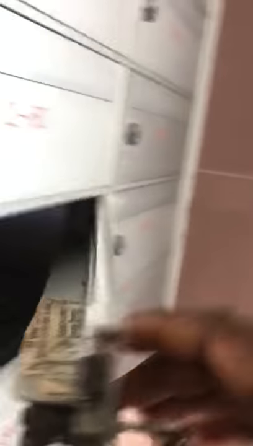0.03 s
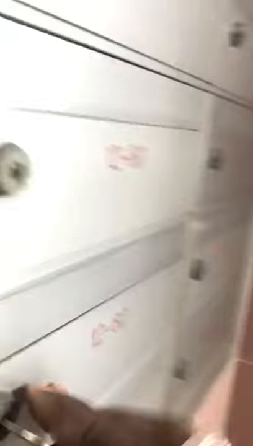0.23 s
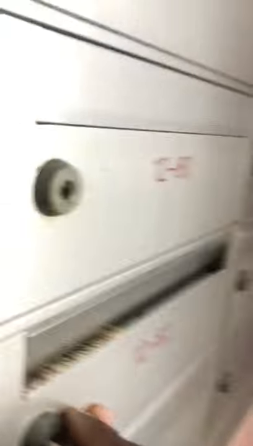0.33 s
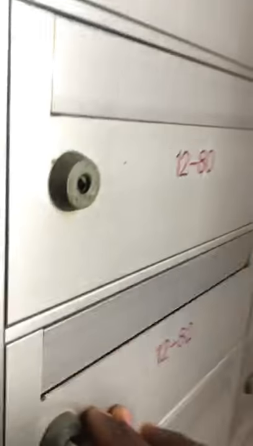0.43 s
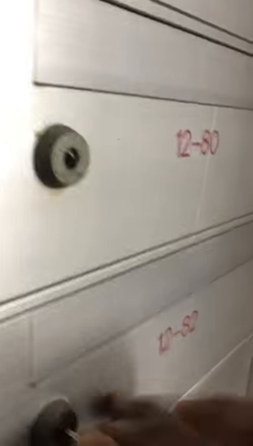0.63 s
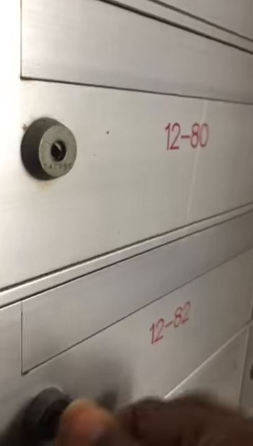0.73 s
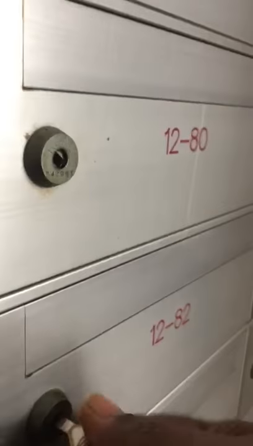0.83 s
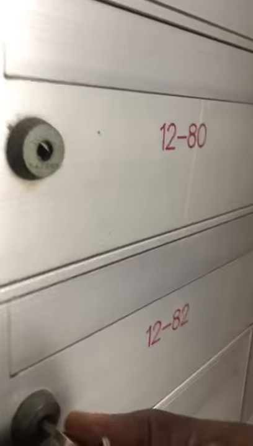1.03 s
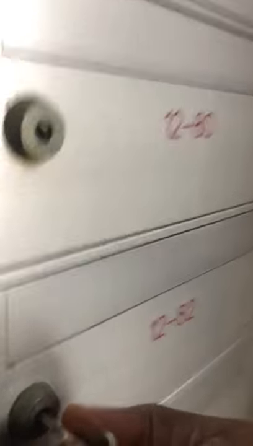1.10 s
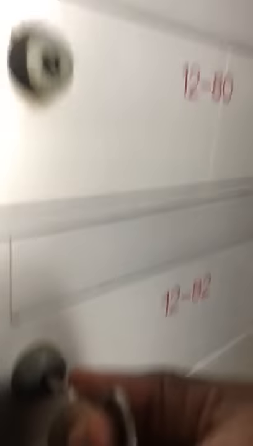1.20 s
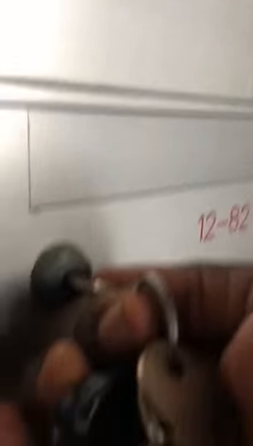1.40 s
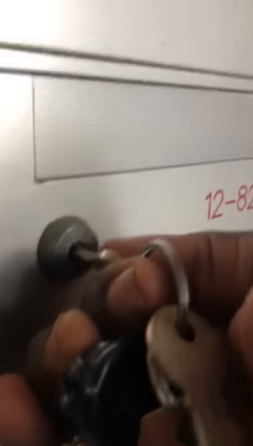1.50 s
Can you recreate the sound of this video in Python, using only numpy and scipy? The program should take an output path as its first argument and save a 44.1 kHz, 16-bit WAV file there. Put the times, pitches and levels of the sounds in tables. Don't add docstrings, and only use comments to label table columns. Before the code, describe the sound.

Close up in a hard-walled lobby, a metal mailbox door taps, slams and clicks shut; keys rattle in short bright chinks, with one loud final jingle, over low distant traffic rumble.

```python
import sys
import numpy as np
from scipy import signal
from scipy.io import wavfile

SR = 44100
rng = np.random.default_rng(int(sys.argv[2]) if len(sys.argv) > 2 else 0)


def unload_wav(signal):
    wavfile.write(
        sys.argv[1],
        SR,
        np.round(np.clip(np.atleast_2d(signal).T, -1, 1) * 32767).astype(np.int16),
    )


def magnitude_from_level(level_db):
    exponent = np.asarray(level_db, float) / 20
    return 10 ** exponent


N = 68355


def rms_one(x):
    return x / np.sqrt(np.mean(x ** 2) + 1e-20)


def in_time(rows):
    return np.interp(np.arange(N) / SR, *np.transpose(rows))


def drift(rate_hz):
    r = np.exp(-80 * np.pi * rate_hz / SR)
    slow = signal.lfilter([1], [1, -2 * r, r * r], rng.standard_normal(N // 40 + 2002))
    slow = rms_one(slow[2000:])
    return np.interp(np.arange(N) / 40, np.arange(len(slow)), slow)


def ring(clicks, hz, t60_s):
    r, w = magnitude_from_level(-60 / (t60_s * SR)), 2 * np.pi * hz / SR
    return signal.lfilter([0, np.sin(w)], [1, -2 * r * np.cos(w), r * r], clicks + 1e-18)


def band(x, low_hz, high_hz):
    edges_hz = [low_hz, min(high_hz, .45 * SR)]
    return signal.sosfilt(signal.butter(2, edges_hz, "band", fs=SR, output="sos"), x)


def coloured(white, spectrum, patchy_db):
    edges_hz = 22 * 2 ** np.arange(0, 9.6, .5)
    hz, db = np.transpose(spectrum)
    out = 0
    for k, (low_hz, high_hz) in enumerate(zip(edges_hz, edges_hz[1:])):
        log_centre = np.log(min(low_hz * high_hz, 11400 ** 2)) / 2
        level_db = np.interp(log_centre, np.log(hz), db, left=-90)
        flicker = magnitude_from_level(level_db + patchy_db * drift(12.4))
        out = out + flicker * band(white[k % 2], low_hz, min(high_hz, 12100))
    return rms_one(out)


def strikes(events, sound):
    out, t = np.zeros(N + SR), np.arange(SR // 4) / SR
    for s, db, *how in events:
        i = int(s * SR)
        out[i:i + len(t)] += magnitude_from_level(db) * sound(t, rng.standard_normal(len(t)), *how)
    return out[:N]


# t/s, level/dB
SWELL = [(0.0, -48.5), (0.288, -44), (0.46, -38), (0.928, -45), (1.19, -41.5), (1.402, -37.5), (1.55, -39)]
# f/Hz, level/dB per Hz
TRAFFIC = [(13, -37), (22, 1), (313, -0.5), (1000, -14.5), (1620, -18.5), (2610, -27), (6790, -38),
           (10700, -46), (12500, -66), (16200, -86.5), (22000, -120)]
# f/Hz, level/dB
HUM = [(97, -51), (199, -46), (295, -55)]


def traffic():
    rumble = coloured(rng.standard_normal((2, N)), TRAFFIC, patchy_db=.8)
    hum = 0
    for hz, db in HUM:
        level = magnitude_from_level(db - 4.0 + 5.1 * drift(49))
        phase = 2 * np.pi * np.cumsum(hz + 3.07 * drift(10.5)) / SR
        hum = hum + level * np.sin(phase)
    return magnitude_from_level(in_time(SWELL) - 2.5) * rumble + hum


def lobby(x):
    t60_s, gap_s, wall_cut_hz = 0.18, .004, 10000
    t = np.arange(SR // 2) / SR
    onset = np.clip((t - gap_s) / 0.0011, 0, 1)
    tail = 0.027 * rng.standard_normal(len(t)) * magnitude_from_level(-60 * t / t60_s) * onset
    return signal.fftconvolve(x, band(tail, 390, wall_cut_hz))[:N]


# t/s, level/dB
BUSTLE = [(0, -49.5), (.15, -45), (.21, -54.5), (.311, -56.5), (.316, -27.5), (.375, -21), (.395, -25),
          (.445, -32), (.52, -34.5), (.73, -49.5), (.77, -42), (.88, -42.5), (.97, -52), (1.085, -58.5),
          (1.098, -40), (1.19, -55.5), (1.22, -54.5), (1.55, -69.5)]
# f/Hz, level/dB per Hz
RUB = [(470, -33), (800, -0.5), (3040, 1.5), (4490, -1.5), (5340, 3.5), (10000, -4), (11500, -15),
       (12500, -47), (16200, -68), (22000, -120)]
# f/Hz, level/dB, t60/s
KEYS = [(2170, -12, .1), (4110, -8, .12), (4610, -8, .2), (5160, -8, .15), (5860, -8, .15), (6630, -4, .12),
        (7620, -6, .15), (8060, -6, .15), (8630, -8, .15), (9240, -2, .22), (9600, -8, .12),
        (10240, 0, .22), (11190, -1, .2), (11960, -3, .15)]


def handling():
    grains_per_s, grain_db = 3100, -3.5
    rub_db, rattle_db, rattle_growth = -3, -9, .64
    sizes = magnitude_from_level(grain_db * np.minimum(rng.exponential(1, (2, N)), 4))
    sizes = sizes * rng.choice([-1, 1], (2, N))
    grains = sizes * (rng.random((2, N)) < grains_per_s * magnitude_from_level(4 * drift(25)) / SR)
    rub = coloured(.6 * rng.standard_normal((2, N)) + grains, RUB, patchy_db=.8)
    dealt = rng.integers(0, len(KEYS), N)
    rattle = 0
    for k, (hz, db, t60_s) in enumerate(KEYS):
        rattle = rattle + magnitude_from_level(db) * ring(grains[0] * (dealt == k), hz, 0.43 * t60_s)
    bustle_db = in_time(BUSTLE)
    rattle_level = magnitude_from_level(rattle_db + rattle_growth * (bustle_db + 18))
    return magnitude_from_level(bustle_db) * (magnitude_from_level(rub_db) * rub + rattle_level * rms_one(rattle))


# t/s, level/dB, f/Hz, t60/s
BOOMS = [
    (0.349, -23, 148.6, 0.13),
    (.370, -24.5, 102.6, .12),
    (0.418, -18, 144.4, 0.036),
    (0.509, -19, 151.4, 0.067),
    (0.585, -38, 67, 0.098),
    (1.288, -40, 296, 0.25),
    (1.359, -25.5, 320, 0.077),
    (1.396, -36, 299, 0.23),
]


def booms():
    t = np.arange(N) / SR
    out = 0
    for s, db, hz, t60_s in BOOMS:
        swell = np.clip((t - s) / 0.011, 0, 1)
        decay = magnitude_from_level(db - 60 * np.maximum(t - s, 0) / t60_s)
        out = out + decay * swell * np.sin(2 * np.pi * hz * (t - s))
    return out


def chink(t, white, hz, second_hz, ring_share):
    chink_db, tick_db, fizz_db, others_db = -13, -9, -17, -13
    chatter, chatter_t60_s, fizz_t60_s, tick_t60_s = .055, .05, .07, .012
    held, detune, free_s, stop_t60_s = .3, .003, .07, .018

    def off_db(a_hz, b_hz):
        return -6 * (np.log2(a_hz / b_hz) / .04) ** 2

    touch = (t == 0) + chatter * white * magnitude_from_level(-60 * t / chatter_t60_s)
    rings = 0
    for (m_hz, db, t60_s), grip in zip(KEYS, white[::-1]):
        level_db = max(off_db(m_hz, hz), off_db(m_hz, second_hz) - 3, db + others_db)
        rings = rings + magnitude_from_level(level_db) * ring(touch, m_hz * (1 + detune * grip), t60_s * held)
    stop_s = np.clip(ring_share, .02, 1) * free_s
    stopped = magnitude_from_level(-np.minimum(60 * np.maximum(t - stop_s, 0) / stop_t60_s, 90))
    tick = white * magnitude_from_level(-60 * t / tick_t60_s) * np.minimum(t / .0006, 1)
    tick = band(tick, hz / 1.4, hz * 1.4)
    fizz = band(white * magnitude_from_level(fizz_db - 60 * t / fizz_t60_s), 5500, SR)
    return fizz + band(magnitude_from_level(chink_db) * rings * stopped + magnitude_from_level(tick_db) * tick, 2500, SR)


# t/s, peak level/dB, favoured f/Hz, second f/Hz, ring share/0-1
CHINKS = [(.388, -17, 11960, 10240, .5), (.405, -15, 11190, 10240, 0.3), (.412, -11.5, 10240, 7630, 0.9),
          (.520, -24.5, 11190, 6630, .1), (.546, -22.5, 6630, 11190, 0), (.5557, -21, 10240, 11190, 0.2),
          (.5776, -20, 10240, 9600, 0.15), (.5816, -16, 10240, 10240, 0.7), (.586, -28, 6630, 8630, 0.4),
          (.600, -20, 11960, 11960, .4), (.6044, -22, 10240, 9600, 0), (.6195, -18, 8640, 9600, 0),
          (.684, -28, 8640, 4100, 0), (.693, -24, 11960, 6640, 0.3), (.742, -26, 8640, 6640, 0.4),
          (.7586, -17, 9240, 6630, 0.27), (.785, -18, 11190, 6630, 0.3), (.808, -28, 11190, 10240, 0.4),
          (.821, -24, 11190, 10240, 0.4), (.831, -19, 11190, 10240, 0.06),
          (.838, -19.5, 10240, 11190, 0.25), (.840, -16.5, 9240, 10240, 1),
          (.883, -25.5, 10240, 9240, 0.03), (.930, -28.5, 7630, 10240, 0.03),
          (.950, -30, 8080, 10240, 0.06), (.9946, -36.5, 6640, 5160, 0.26), (1.0695, -24, 4110, 11190, 0),
          (1.0875, -34, 10240, 7630, 0), (1.0932, -16, 5160, 4110, 0.3), (1.0945, -17.5, 10240, 11190, 0.1),
          (1.103, -14.5, 7630, 7630, 0.5), (1.114, -17.5, 9240, 6630, 0), (1.1256, -6, 10240, 10240, 0.13),
          (1.1260, -21, 6160, 7630, 0.05), (1.155, -26, 10240, 6640, 0.17), (1.169, -23, 6640, 7630, 0),
          (1.1806, -19, 11190, 8060, 0), (1.3533, -29, 10240, 7630, 0)]


def key_bunch():
    return strikes(CHINKS, chink)


# f/Hz, level/dB, t60/s
DOOR = [(595, -3.5, 0.023), (955, -4.5, 0.019), (1566, -23, 0.03), (1627, 3.5, 0.03), (2186, 9, 0.042),
        (2454, 1.5, 0.013), (2900, 7.5, 0.0033), (3700, -13, 0.012), (3790, 10.5, 0.008), (4320, 7, 0.015),
        (5500, 11, 0.012), (6500, 13.5, 0.008), (8260, 13.5, 0.02), (8720, 16.5, 0.01)]


def knock(t, white, hz, shake_t60_s, body_db):
    knock_db, crack_db, far_modes_db = -25.5, -0.5, -21
    blow_size, shudder_share, rise_s, contact_s = 5.5, .35, .0009, .0006
    body_hz, body_late_s, t60_max_s, cycles_max = 1200, .002, .045, 30
    shake = white * magnitude_from_level(-60 * t / max(shake_t60_s, .004)) * np.minimum(t / rise_s, 1) ** 2
    blow = blow_size * (np.arange(len(t)) == int(contact_s * SR))
    drive = blow + shudder_share * shake
    late = band(np.roll(blow, int(body_late_s * SR)), body_hz / 3, body_hz * 2)
    panel = 0
    for k, (m_hz, db, t60_s) in enumerate(DOOR):
        low = m_hz < body_hz
        near_db = -6 * (np.log2(m_hz / hz) / .3) ** 2
        level_db = max(near_db, body_db if low else far_modes_db) + db
        damped_s = min(t60_s, t60_max_s, cycles_max / m_hz)
        panel = panel + (-1) ** k * magnitude_from_level(level_db) * ring(late if low else drive, m_hz, damped_s)
    return magnitude_from_level(knock_db) * panel + magnitude_from_level(crack_db) * band(shake, hz / 1.79, hz * 1.98)


# t/s, peak level/dB, centre f/Hz, shake t60/s, low body level/dB
KNOCKS = [(.007, -35, 1790, 0.013, -0.5), (.2369, -13, 3330, 0.029, -10), (.2375, -24, 5700, 0.0044, -22),
          (.3140, -10.5, 2400, 0.01, 0), (.324, -12, 2410, 0.06, 2.5), (.327, -28.5, 8140, 0.028, -25),
          (.333, -27, 4000, .06, -25), (.3432, -3.5, 2900, 0.036, 1.5), (.345, -16, 480, 0.031, -9),
          (.3436, -8.5, 8400, 0.022, -31), (.349, -28, 2300, 0.08, -40), (.3670, -5.5, 8700, 0.012, -25),
          (.3685, -6, 1480, 0.013, -38), (.384, -16.5, 9500, 0.16, -35), (.3895, -14, 4750, 0.1, -27),
          (.397, -15, 4300, 0.017, -37), (.4874, -6.5, 7640, 0.0082, -36), (.4880, -9.5, 3200, 0.036, -4.5),
          (.499, -27, 2570, 0.025, 11), (.503, -19, 2540, 0.022, -10), (.6198, -28.5, 4100, 0.03, -29),
          (.631, -17.5, 2730, 0.019, 3), (.645, -28, 2580, 0.0073, -12), (.751, -26.5, 1390, 0.046, -8),
          (.7586, -21.5, 5900, 0.036, -29), (.8447, -12, 2680, 0.016, 1.5), (.9946, -40, 5300, 0.018, -30),
          (1.035, -36.5, 2650, 0.035, -30), (1.0685, -33.5, 3950, 0.1, -35),
          (1.0877, -42, 4200, 0.012, -32), (1.0935, -30.5, 4100, 0.055, -26),
          (1.132, -41, 4100, 0.019, -27), (1.181, -40, 3800, 0.014, -30), (1.238, -37.5, 2030, 0.017, 12),
          (1.245, -35, 696, 0.095, -6)]


def metal_door():
    return band(strikes(KNOCKS, knock), 160, SR)


def scene():
    echo_db, keys_echo_db = -5.5, -12
    far, hand = traffic(), handling()
    door, keys = metal_door(), key_bunch()
    echo = magnitude_from_level(echo_db) * lobby(door + magnitude_from_level(keys_echo_db) * keys)
    return (door + keys + echo + booms() + hand + far)[None]


def band_limit(x):
    return signal.sosfilt(signal.butter(12, 13080, fs=SR, output="sos"), x)


def record(dry):
    peak, top_cut_hz, low_cut_hz = .8, 12900, 48
    mix = peak * np.tanh(dry / peak)
    mix = signal.sosfilt(signal.cheby2(12, 60, top_cut_hz, fs=SR, output="sos"), mix)
    mix = signal.sosfilt(signal.butter(2, low_cut_hz, "high", fs=SR, output="sos"), mix)
    return band_limit(mix)


dry = scene()
out = record(dry)
unload_wav(out)
```